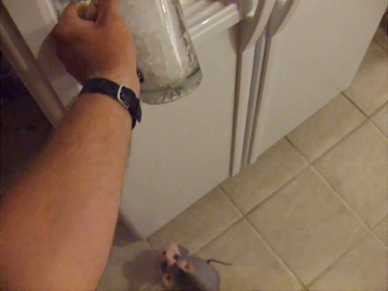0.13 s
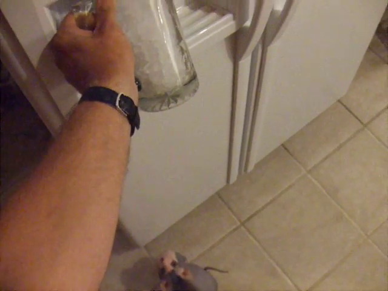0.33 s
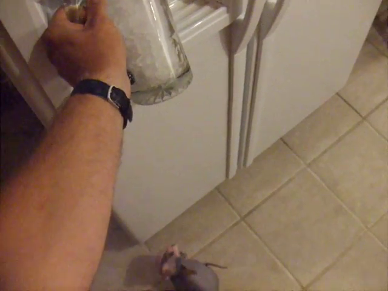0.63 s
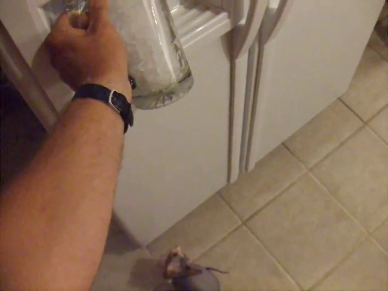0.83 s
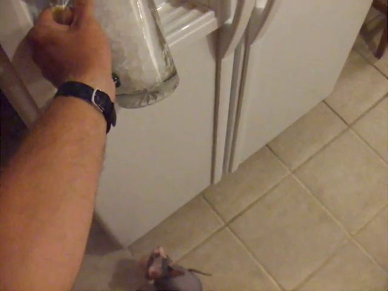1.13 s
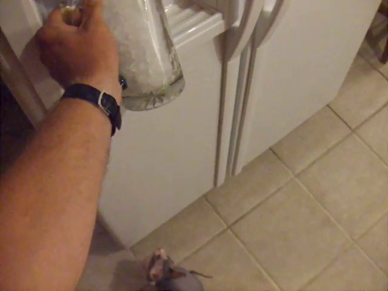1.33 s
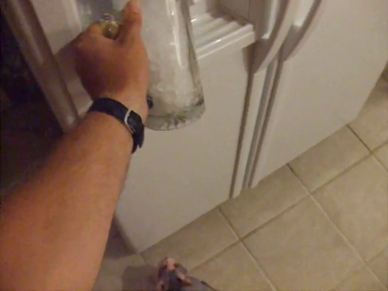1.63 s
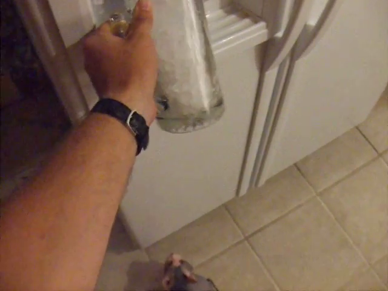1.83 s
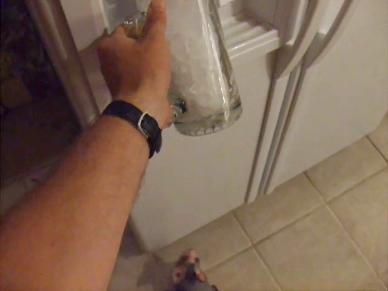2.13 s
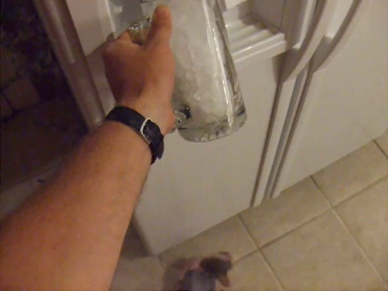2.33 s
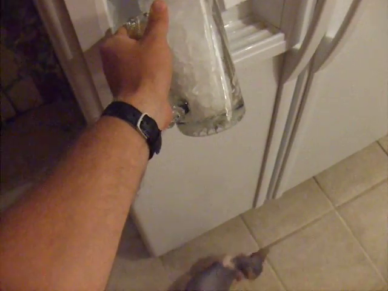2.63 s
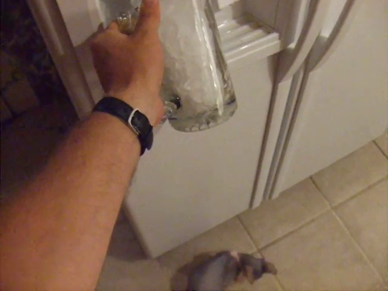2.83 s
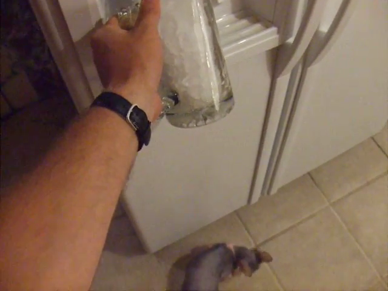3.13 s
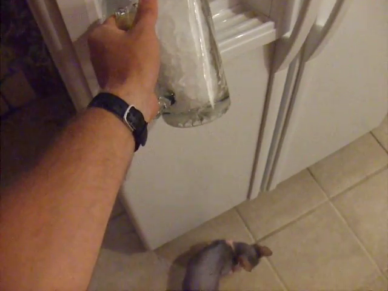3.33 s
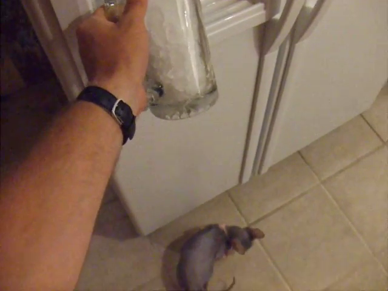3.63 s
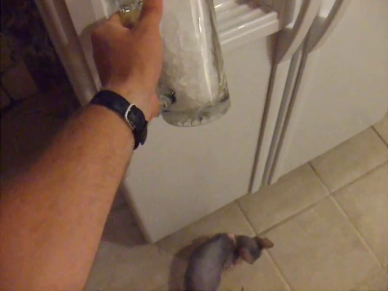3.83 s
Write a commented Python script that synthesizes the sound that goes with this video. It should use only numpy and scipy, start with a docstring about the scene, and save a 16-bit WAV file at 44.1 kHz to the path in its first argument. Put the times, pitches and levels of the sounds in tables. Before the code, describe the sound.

Motorised ice crusher whines and crunches cubes into a glass, then leaves a quiet humming kitchen

```python
"""A geared motor whines and sags for two seconds as the blades of a refrigerator's ice crusher bite.
Cubes rattle, crunch and crack in the plastic bin (random grains, noise bursts); chips clink into a glass mug.
The motor stops, the lever springs back with a ring of decaying sines, and the last lumps drop.
In the quiet kitchen the refrigerator hums over hiss, and the mug creaks and ticks against the dispenser."""
import sys
import numpy as np
from scipy import signal
from scipy.fft import rfft, irfft
from scipy.io import wavfile
from scipy.ndimage import uniform_filter1d, map_coordinates

SR = 44100
rng = np.random.default_rng(int(sys.argv[2]) if len(sys.argv) > 2 else 0)


def output_pcm(signal):
    """Save a mono or channel-first signal as 16-bit PCM at the path in sys.argv[1].

    Samples are clipped to [-1, 1] before scaling.
    """
    pcm = np.clip(np.atleast_2d(signal).T, -1, 1) * 32767
    wavfile.write(sys.argv[1], SR, np.round(pcm).astype(np.int16))


N = 176400
TOP_HZ = 9000  # nothing is heard above


def amp(db):
    """Decibels to gain."""
    return 10 ** (np.asarray(db) / 20)


def unit(x):
    """Scale to rms 1."""
    return x / np.sqrt(np.mean(x ** 2) + 1e-20)


def along(points, hz):
    """Interpolate (Hz, value) points on a log frequency axis."""
    f, v = np.transpose(points)
    return np.interp(np.log(hz + 1), np.log(f + 1), v)


def curves(rows):
    """One value per sample for each column after the time."""
    s, *cols = np.transpose(rows)
    return [np.interp(np.arange(N) / SR, s, c) for c in cols]


def wobble(rate_hz):
    """A smooth random curve, rate_hz knots a second."""
    knots = rng.standard_normal(int(N * rate_hz / SR) + 4)
    return map_coordinates(knots, [np.arange(N) * rate_hz / SR])


def filtered(x, response):
    """x times a response of frequency."""
    hz = np.fft.rfftfreq(2 * N, 1 / SR)
    return irfft(rfft(x, 2 * N) * response(hz))[:N]


def coloured(x, colour):
    """Minimum-phase filter through (Hz, dB) points; white noise keeps its power."""
    def response(hz):
        # folding the cepstrum makes the filter causal
        cep = irfft(np.log(amp(along(colour, hz))))
        cep[1:N] *= 2
        cep[N + 1:] = 0
        h = np.exp(rfft(cep))
        return h / np.sqrt(np.mean(abs(h) ** 2 * (hz < TOP_HZ)))
    return filtered(x, response)


def ringing(x, modes):
    """Resonances (Hz, width Hz, dB) of alternating sign; white noise keeps its power."""
    def response(f):
        h = 0
        for k, (centre, width, db) in enumerate(modes):
            damping = 1j * f * width
            h = h + (-1) ** k * amp(db) * damping / (centre ** 2 - f * f + damping)
        return h / np.sqrt(np.mean(abs(h) ** 2))
    return filtered(x, response)


def grains(rate_hz, spread_db):
    """Tiny impacts at random moments, of uneven size and random sign, rms 1."""
    size = amp(spread_db * np.clip(rng.standard_normal(N), -2, 2))
    sign = np.sign(rng.standard_normal(N))
    return unit(size * sign * (rng.random(N) < rate_hz / SR))


def bursts(rows, t60_s, attack_s=0.00028):
    """One short decaying burst of noise for each (s, dB) row."""
    env, t = np.zeros(N + SR), np.arange(SR // 3) / SR
    for s, db in rows:
        env[round(s * SR):][:len(t)] += amp(db - 60 * t / t60_s) * (1 - np.exp(-t / attack_s))
    return env[:N] * rng.standard_normal(N)


def struck(rows, modes):
    """Decaying sines (Hz, dB, t60 s) set ringing by each (s, dB) row."""
    out, t = np.zeros(N + SR), np.arange(SR) / SR
    note = sum(amp(db - 60 * t / t60) * np.sin(2 * np.pi * hz * t) for hz, db, t60 in modes)
    for s, db in rows:
        out[round(s * SR):][:SR] += amp(db) * note
    return out[:N]


# Gear whine, sagging and fading under load. Each row: time in s, pitch in Hz, level in dB.
GEAR_WHINE = [(0, 1252, -22.5), (.12, 1240, -24), (.27, 1235, -27), (.4, 1127, -37), (.6, 1164, -53),
              (.73, 1252, -28.5), (.84, 1279, -28), (.95, 1247, -23), (1.06, 1282, -30),
              (1.17, 1253, -22.5), (1.26, 1288, -33.5), (1.42, 1301, -22.5), (1.5, 1217, -27),
              (1.62, 1200, -30.5), (1.78, 1264, -25), (1.88, 1207, -36), (2.02, 1244, -38)]
# Partials of the whine. Each row: multiple of the pitch, relative level in dB.
WHINE_PARTIALS = [(.25, -13), (1, 0), (2, -17), (2.85, -29)]
WHINE_ROUGHNESS, WHINE_JITTER = .24, .003  # share of level, share of pitch


def motor():
    """Gear whine: partials of a gliding pitch, with random jitter in pitch and roughness in level."""
    hz, db = curves(GEAR_WHINE)
    phase = 2 * np.pi * np.cumsum(hz * (1 + WHINE_JITTER * wobble(120))) / SR
    tone = sum(amp(level) * np.sin(k * phase) * (1 + WHINE_ROUGHNESS * wobble(220))
               for k, level in WHINE_PARTIALS)
    return np.sqrt(2) * amp(db) * tone


STOP_S, STOP_DB_PER_S = 2.002, 339.5


def running():
    """Gain of the machine: full until it is switched off, then a fast fade as it brakes."""
    return amp(-STOP_DB_PER_S * np.maximum(np.arange(N) / SR - STOP_S, 0))


# Load on the crusher. Each row: time in s, cube rattle and blade grind in relative dB.
CRUSHER_LOAD = [(0, -26, -33), (.15, -23.5, -28.5), (.22, -30.5, -35.5), (.29, -23, -32), (.35, -22, -17.5),
                (.48, -22, -21), (.6, -22, -22), (.69, -28.5, -26.5), (.8, -27, -33), (.93, -25.5, -24),
                (1.04, -24, -38.5), (1.17, -25.5, -27), (1.25, -23, -36.5), (1.425, -28, -31.5),
                (1.445, -19, -28), (1.58, -20, -26), (1.74, -27, -30), (1.87, -26.5, -34.5),
                (2.02, -26, -32.5)]
# Spectrum of cubes in the bin. Each row: frequency in Hz, level in dB.
BIN_COLOUR = [(200, -27), (520, -8.5), (930, 1.5), (1300, 3), (1500, -2), (2200, -10.5), (2620, -11),
              (3100, -19.5), (3500, -18.5), (4700, -30), (8000, -42)]
# Spectrum of grinding. Each row: frequency in Hz, level in dB.
GRIND_COLOUR = [(30, -27.5), (80, -19), (120, -5.5), (350, 2), (500, -7), (2000, -26), (6000, -44)]
# Cabinet resonances under the rattle. Each row: frequency in Hz, width in Hz, relative level in dB.
CABINET_MODES = [(161, 8, -11), (241, 11, -2), (310, 16, -2), (592, 14, -5), (685, 13, -7), (795, 14, -3)]
RATTLE_DB, CRUNCH_DB, CABINET_DB, CABINET_SWAY_DB = -1.5, -2.5, -14, 4


def crusher():
    """Cubes rattle in the bin, shake the resonant cabinet and are ground by the blades."""
    rattle_db, crunch_db = curves(CRUSHER_LOAD)
    rattle = grains(rate_hz=1500, spread_db=1) * amp(rattle_db + RATTLE_DB + 1.96 * wobble(44.74))
    crunch = grains(rate_hz=960, spread_db=4) * amp(crunch_db + CRUNCH_DB)
    cabinet = 0
    for hz, width, db in CABINET_MODES:
        sway_db = CABINET_SWAY_DB * wobble(9.4)
        cabinet = cabinet + ringing(rattle, [(hz, width, 0)]) * amp(db + CABINET_DB + sway_db)
    return coloured(rattle, BIN_COLOUR) + cabinet + coloured(crunch, GRIND_COLOUR)


# Cubes cracking between the blades. Each row: start in s, relative level in dB, thump over crack in dB.
CUBE_CRACKS = [(.18, -11, -8), (0.2009, -5.5, 8.5), (0.324, -10, -4), (0.355, -17, -2), (0.392, -13, -1.5),
               (0.466, -14, 1.5), (0.497, -11, -1.5), (0.519, -20.5, -4.5), (0.664, -10.5, -0.5),
               (1.144, -18.5, -2), (1.447, -9.5, -16), (1.566, -15, 2), (1.739, -10, 0), (1.897, -16.5, 2),
               (1.983, -18.5, -12), (2.006, -23.5, -13)]
CRACK_T60_S, SPLINTER_DB = 0.046, 4
THUMP_T60_S, THUMP_HZ, THUMP_HIGHPASS_HZ = 0.0099, 432, 120


def cracks():
    """A cube breaks: splintering noise in the bin and a damped thump through the blades."""
    crack = bursts([(s, db) for s, db, _ in CUBE_CRACKS], CRACK_T60_S, attack_s=0.00087)
    crack *= unit(amp(SPLINTER_DB * wobble(400)))
    thump = struck([(s, db + low) for s, db, low in CUBE_CRACKS], [(THUMP_HZ, 0, THUMP_T60_S)])
    thump = filtered(thump, lambda hz: hz ** 2 / (hz ** 2 + THUMP_HIGHPASS_HZ ** 2))
    return coloured(crack, BIN_COLOUR) + thump


# Falling ice dust. Each row: time in s, relative level in dB.
DUST_LEVEL = [(0, -41), (.33, -34), (.75, -42), (1.3, -56), (1.47, -41), (2.15, -40.5), (2.6, -83)]
# Spectrum of the dust. Each row: frequency in Hz, level in dB.
DUST_COLOUR = [(1000, -41.5), (2600, 6), (3700, -2), (5200, -2), (5800, 0), (8500, -4.5)]
# Lumps landing in the mug. Each row: start in s, clink in relative dB, mug note in dB.
MUG_LUMPS = [(.11, -20, -14), (.119, -20.5, -18.5), (.138, -15.5, -13.5), (.282, -20.5, -24.5),
             (0.8212, -13, -19.5), (2.0833, -11, -26.5), (2.105, -18.5, -36.5), (2.1196, -22, -24),
             (2.186, -35.5, -39)]
# Small chips ticking on the glass. Each row: start in s, relative level in dB.
GLASS_CHIPS = [(0.179, -23.5), (0.4997, -24.5), (0.6665, -24.5), (0.893, -25), (1.022, -29),
               (1.1591, -27.5), (1.283, -30), (1.3798, -27), (1.6733, -25), (1.896, -20.5), (1.9442, -23.5),
               (2.282, -32)]
# Resonances of a clink. Each row: frequency in Hz, width in Hz, relative level in dB.
GLASS_MODES = [(1450, 900, -6), (2640, 450, 0), (4300, 1400, -6), (5850, 650, 1), (7300, 1300, -2)]
DUST_DB, CHIP_T60_S = -4, 0.033
CHIP_SCATTER = .07  # spread of log pitch


def falling_ice():
    """Lumps and chips excite glass resonances amid a patter of dust; every chip has its own pitch."""
    dust_db, = curves(DUST_LEVEL)
    patter = grains(rate_hz=770, spread_db=-0.5) * amp(dust_db + DUST_DB + 4.4 * wobble(45))
    hits = bursts([(s, db) for s, db, _ in MUG_LUMPS], t60_s=0.025, attack_s=0.00088)
    ice = coloured(patter, DUST_COLOUR) + ringing(hits, GLASS_MODES)
    pitches = np.exp(CHIP_SCATTER * rng.standard_normal(len(GLASS_CHIPS)))
    for row, pitch in zip(GLASS_CHIPS, pitches):
        modes = [(hz * pitch, width, db) for hz, width, db in GLASS_MODES]
        ice = ice + ringing(bursts([row], CHIP_T60_S, attack_s=0.0011), modes)
    return ice


# Short, ice-damped note of the mug. Each row: frequency in Hz, relative level in dB, t60 in s.
MUG_RING = [(2606, 0, .06)]


def mug_note():
    """Each landing lump rings the glass as a decaying sine."""
    return struck([(s, db) for s, _, db in MUG_LUMPS], MUG_RING)


# Ring of the lever. Each row: frequency in Hz, level in dB, t60 in s.
LEVER_MODES = [(412, -37.5, 0.54), (791, -34.5, 0.21), (1480, -41.5, 0.53)]


def lever():
    """The lever springs back and rings on as decaying sines."""
    return struck([(2.068, 0)], LEVER_MODES)


# Small jerks of the mug along the plastic. Each row: start in s, relative level in dB.
MUG_SLIPS = [(3.132, -39.5), (3.24, -43.5), (3.29, -44), (3.341, -43), (3.402, -40), (3.46, -42),
             (3.501, -44.5), (3.558, -43.5), (3.605, -40), (3.728, -45)]
# Resonances of the jerks. Each row: frequency in Hz, width in Hz, relative level in dB.
CREAK_MODES = [(371, 24, 3), (850, 150, -6), (1140, 140, -4)]
# Ticks of mug and dispenser. Each row: start in s, relative level in dB, ring in Hz.
CONTACT_TICKS = [(2.433, -39, 6000), (2.6294, -32.5, 790), (3.8104, -30.5, 3150), (3.985, -35, 1170)]
SLIP_DB, SLIP_T60_S = -4, 0.16


def handling():
    """The mug slips in jerks that excite plastic and glass resonances, and ticks on the dispenser."""
    creak = amp(SLIP_DB) * ringing(bursts(MUG_SLIPS, SLIP_T60_S), CREAK_MODES)
    glass_modes = [(hz, 250, db) for hz, db, _ in MUG_RING]
    creak += amp(-3.5) * ringing(bursts(MUG_SLIPS, t60_s=0.028), glass_modes)
    return creak + sum(tick(s, db, hz) for s, db, hz in CONTACT_TICKS)


# Spectrum of a dry contact. Each row: frequency in Hz, level in dB.
CONTACT_COLOUR = [(100, -40), (500, -9), (3200, -9), (7200, -10.5)]


def tick(s, db, hz):
    """A dry contact: a coloured noise burst with one short resonance."""
    contact = coloured(bursts([(s, db)], t60_s=0.027, attack_s=0.0011), CONTACT_COLOUR)
    return contact + ringing(bursts([(s, db - 4.5)], t60_s=0.027), [(hz, 400, 0)])


# Spectrum of the steady hiss. Each row: frequency in Hz, level in dB.
HISS_COLOUR = [(58, -5.5), (92, -12.5), (180, -5), (290, -5.5), (520, -12.5), (1800, -19.5), (7000, -22)]
HISS_DB, HUM_DB, HUM_HZ = -50, -62, 163


def background():
    """Steady coloured noise and the refrigerator's hum, a sine wavering in phase and level."""
    phase = 2 * np.pi * HUM_HZ * np.arange(N) / SR + .4 * wobble(20)
    hum = np.sqrt(2) * np.sin(phase) * amp(HUM_DB + 0.8 * wobble(0.37))
    return hum + amp(HISS_DB) * coloured(rng.standard_normal(N), HISS_COLOUR)


KITCHEN_T60_S = 0.66


def kitchen(x):
    """Reverberation of the tiled room: convolution with decaying noise after a 5 ms gap."""
    t = np.arange(SR * 3 // 4) / SR
    tail = rng.standard_normal(len(t)) * amp(-60 * t / KITCHEN_T60_S) * (t > .005)
    return signal.fftconvolve(x, tail / np.linalg.norm(tail))[:N]


BODY_WET_DB, CLINK_WET_DB, TONE_WET_DB = -6.5, -6, -14


def scene():
    """The machine, the mug and the room around them."""
    body = crusher() * running() + cracks() + handling() + lever()
    tones = motor() * running() + mug_note()
    clinks = falling_ice()
    room = kitchen(amp(BODY_WET_DB) * body + amp(CLINK_WET_DB) * clinks + amp(TONE_WET_DB) * tones)
    return (body + tones + clinks + room + background())[None]


# Treble roll-off of the microphone. Each row: frequency in Hz, gain in dB.
MIC_RESPONSE = [(7400, -0.5), (8000, -6), (9000, -25.5)]
LIMIT_DB, RECOVER_DB_PER_S = -3, 70


def record(dry):
    """The microphone rolls off the treble; a limiter ducks peaks above LIMIT_DB and recovers linearly in dB."""
    x = filtered(dry[0], lambda hz: amp(along(MIC_RESPONSE, hz)))
    over_db = 20 * np.log10(np.maximum(abs(x) / amp(LIMIT_DB), 1))
    recovery_db = RECOVER_DB_PER_S * np.arange(N) / SR
    held_db = np.maximum.accumulate(over_db + recovery_db) - recovery_db
    duck_db = uniform_filter1d(held_db, size=48)
    return filtered(x * amp(-duck_db), lambda hz: hz < TOP_HZ)[None]


dry = scene()
out = record(dry)
output_pcm(out)
```